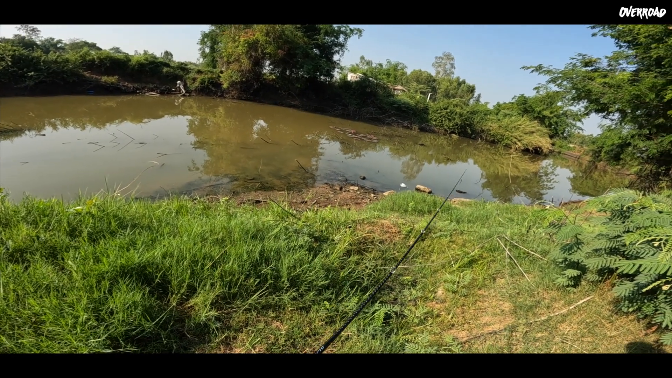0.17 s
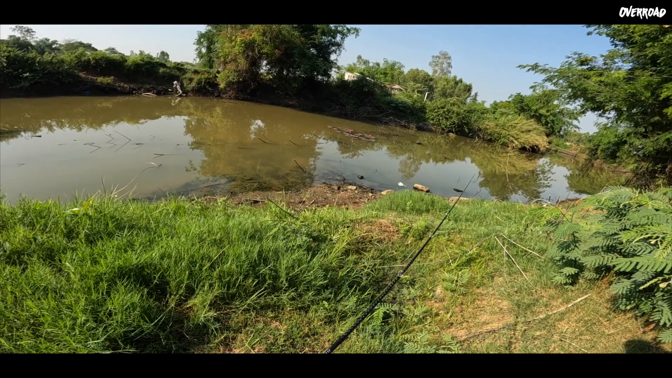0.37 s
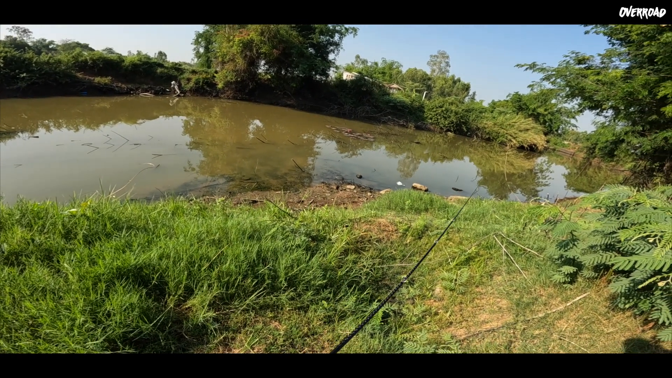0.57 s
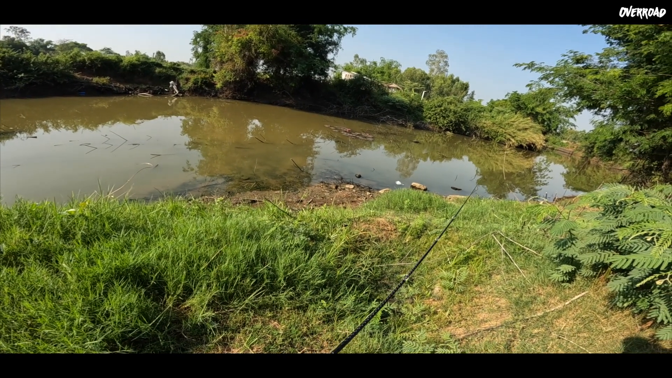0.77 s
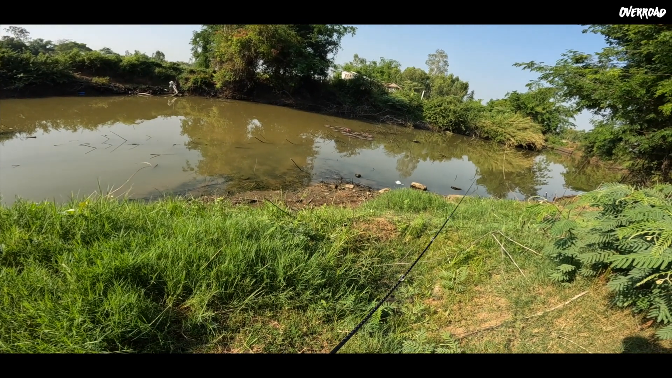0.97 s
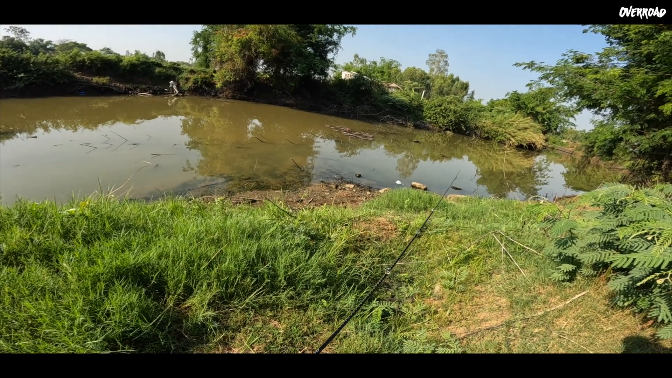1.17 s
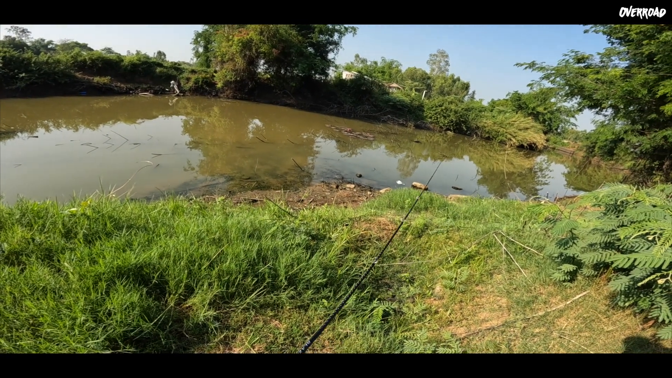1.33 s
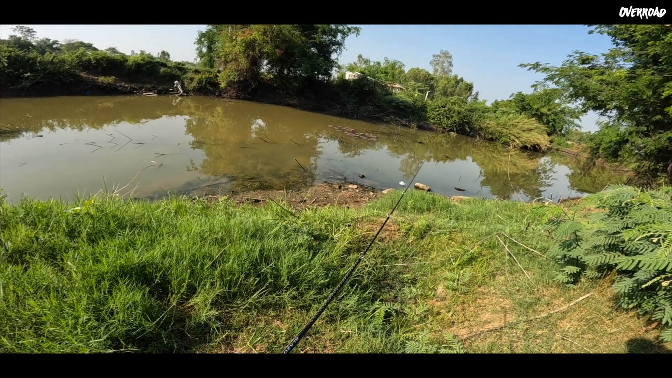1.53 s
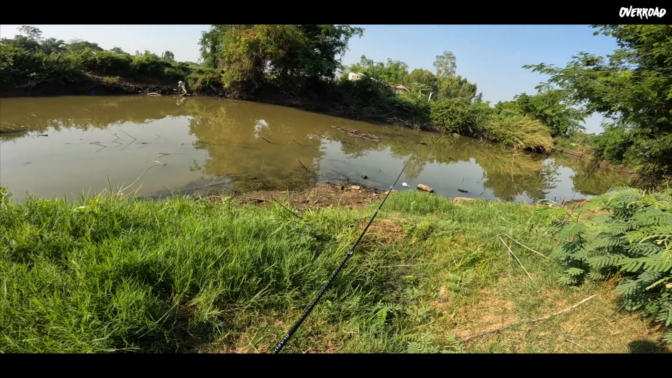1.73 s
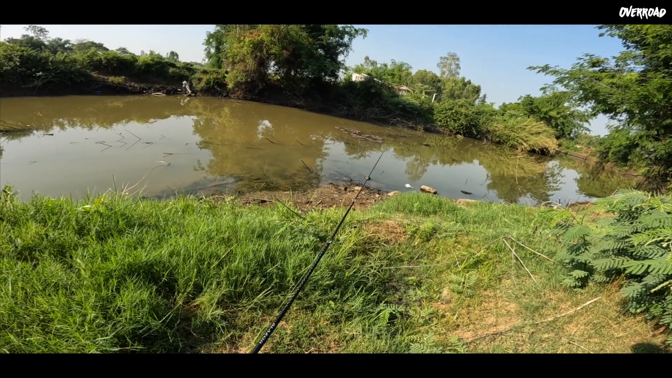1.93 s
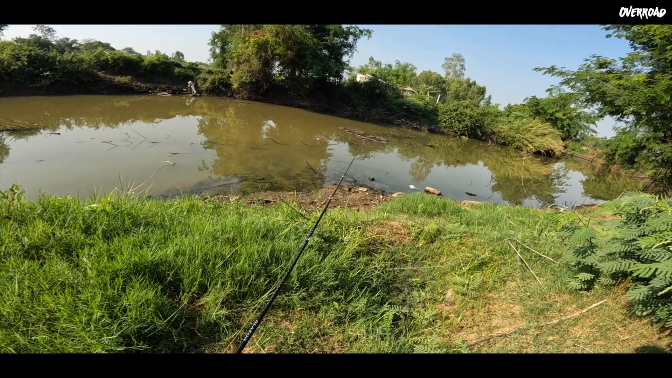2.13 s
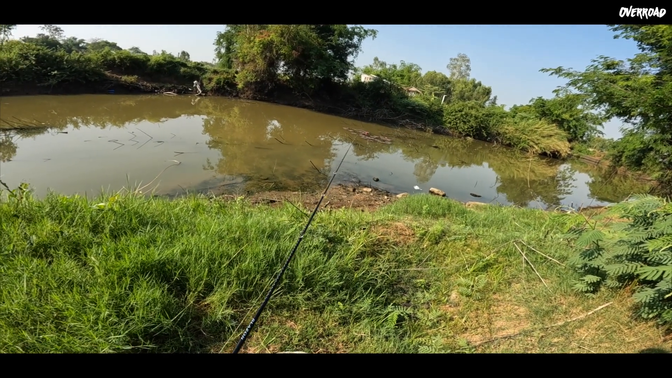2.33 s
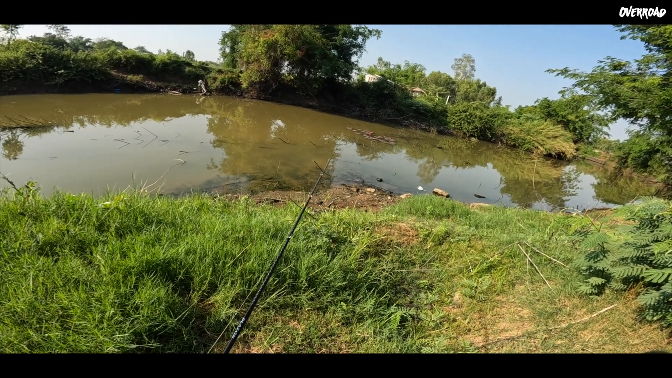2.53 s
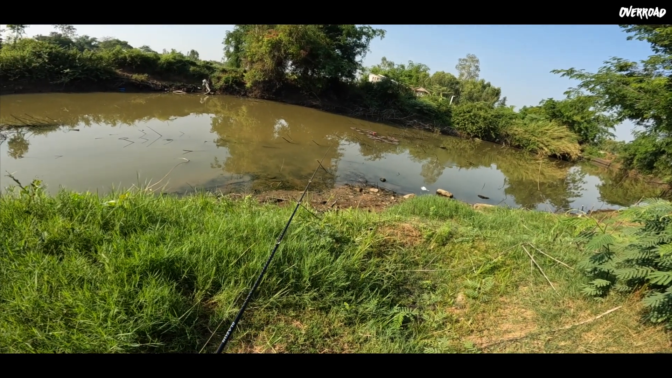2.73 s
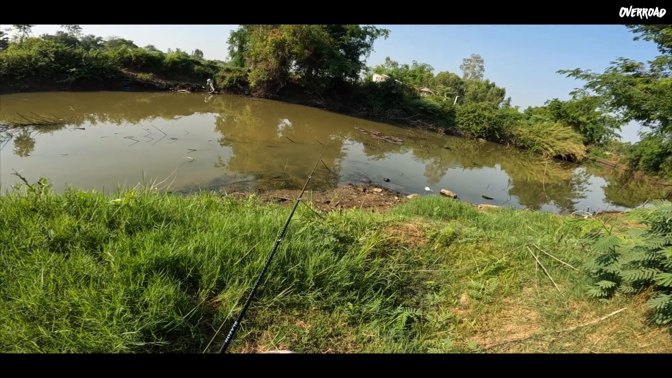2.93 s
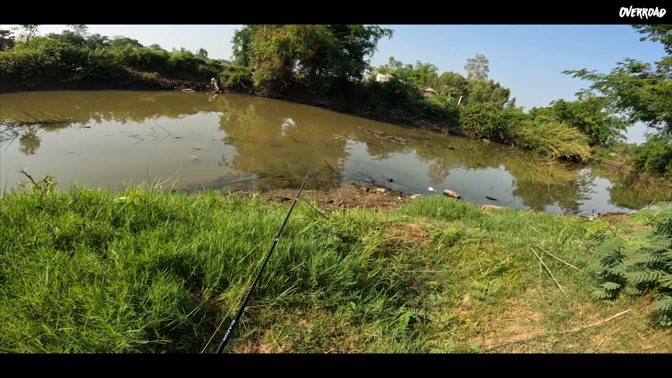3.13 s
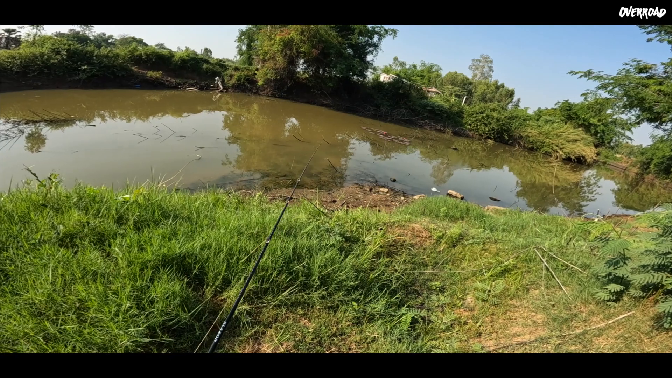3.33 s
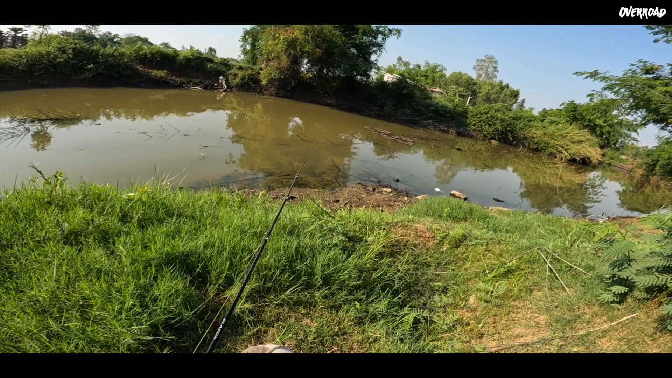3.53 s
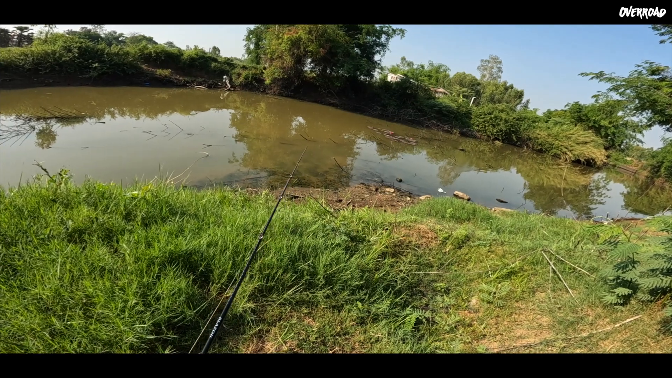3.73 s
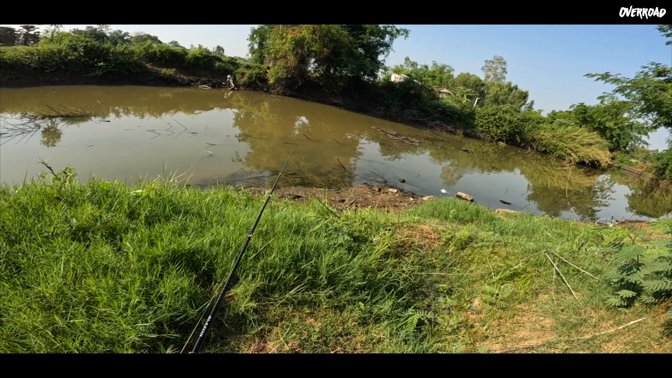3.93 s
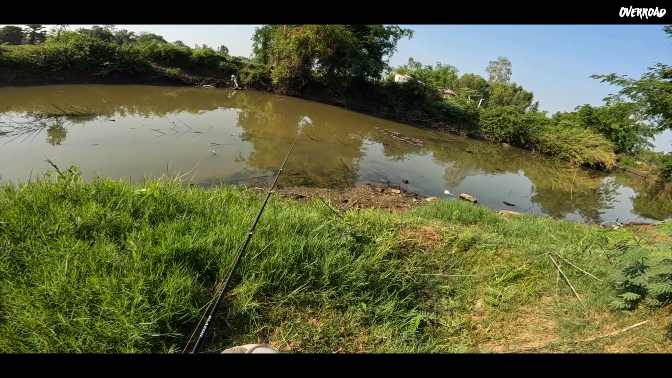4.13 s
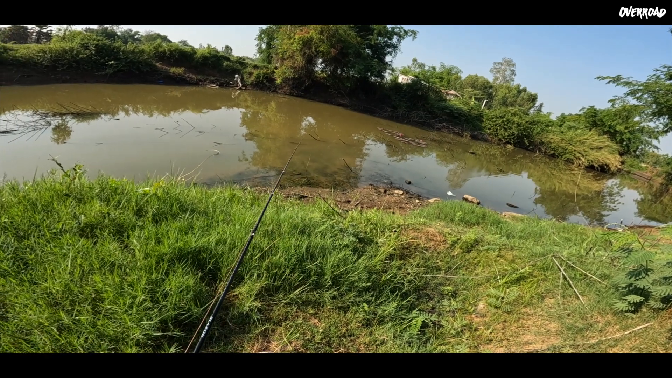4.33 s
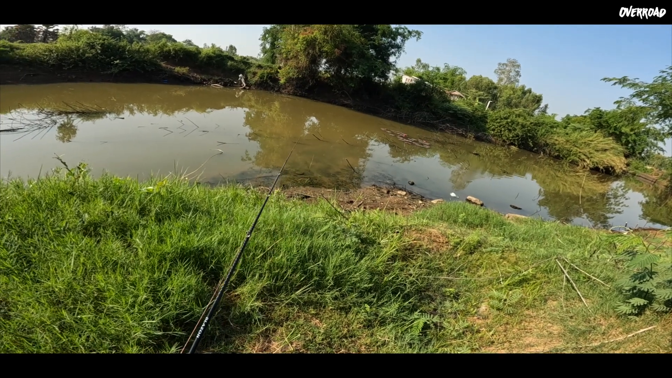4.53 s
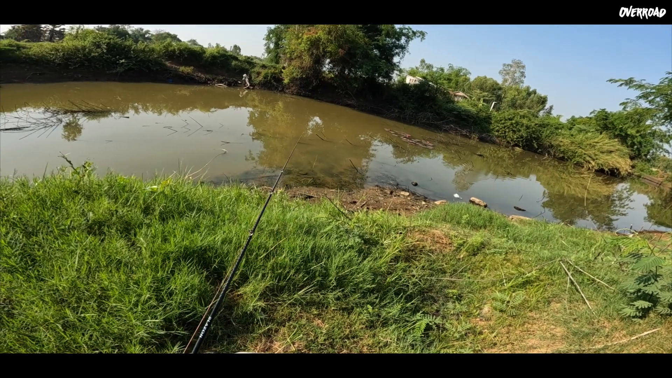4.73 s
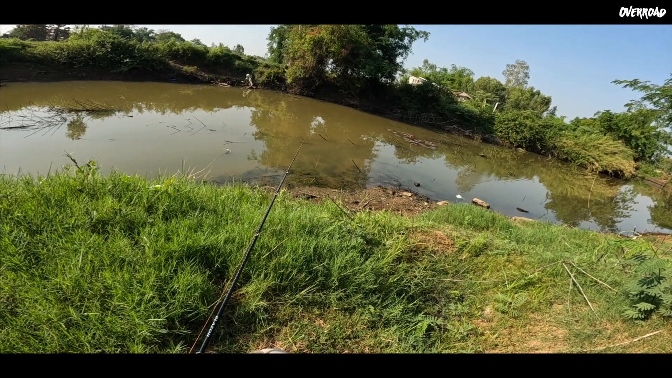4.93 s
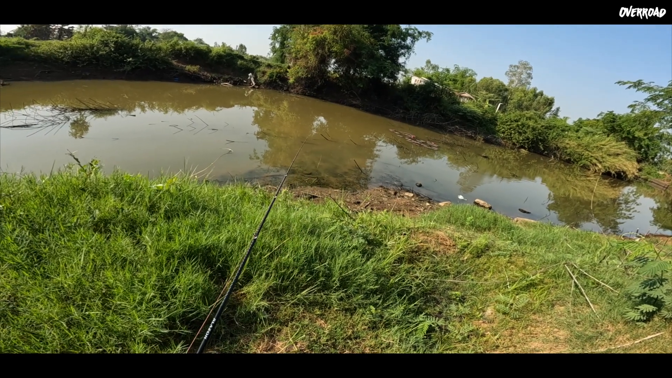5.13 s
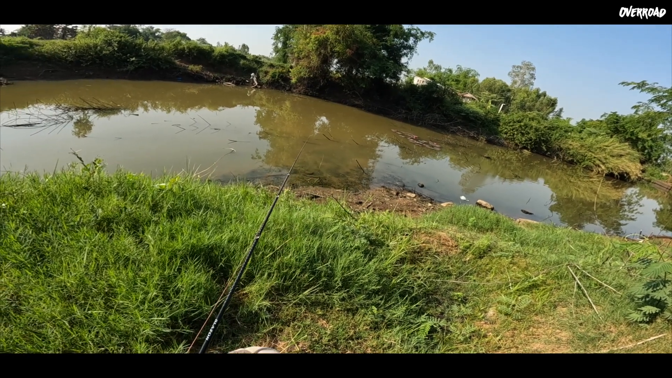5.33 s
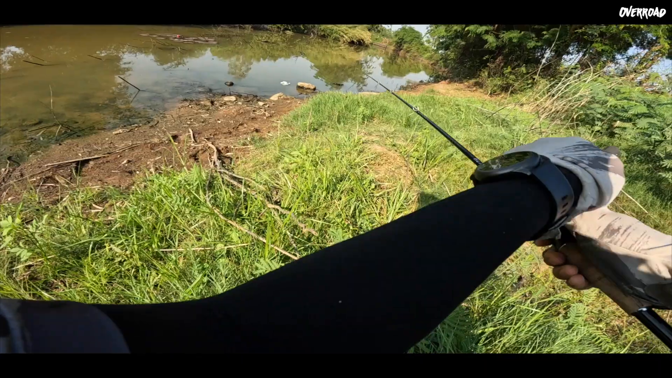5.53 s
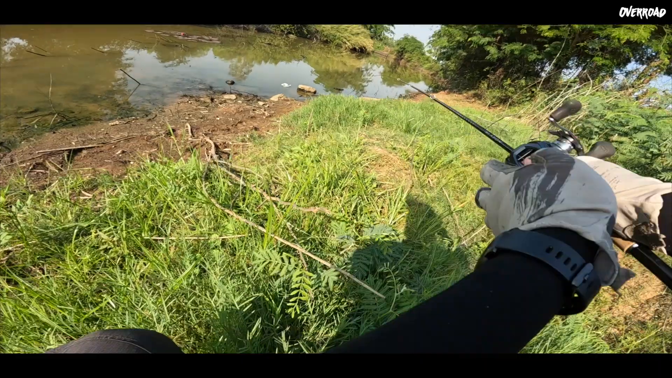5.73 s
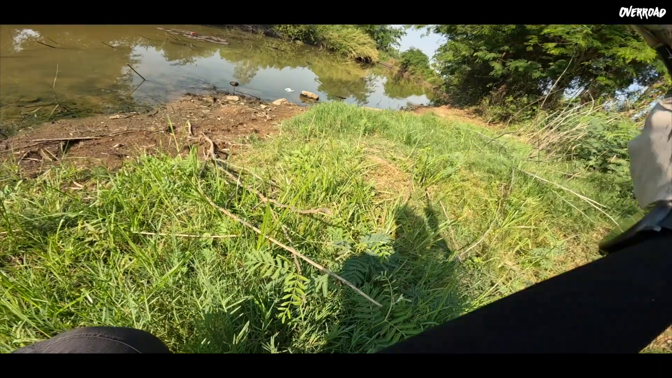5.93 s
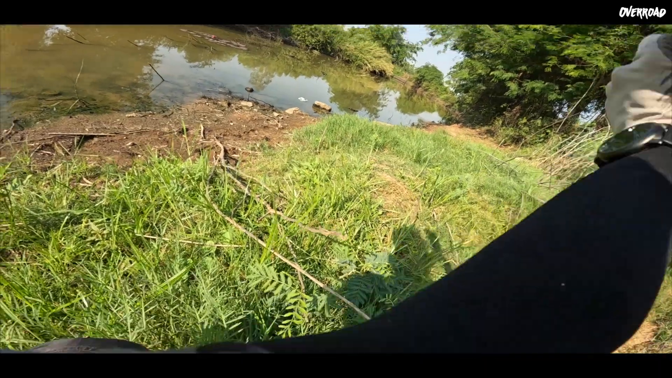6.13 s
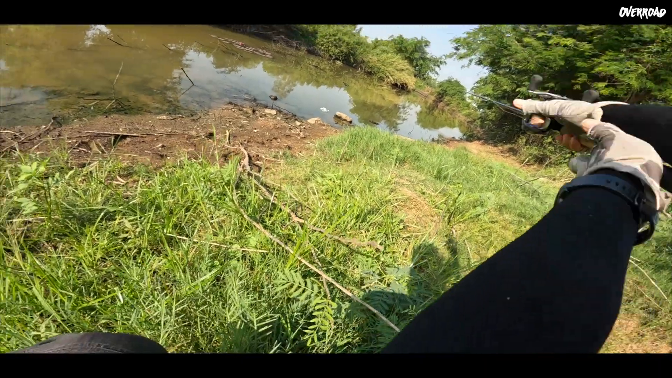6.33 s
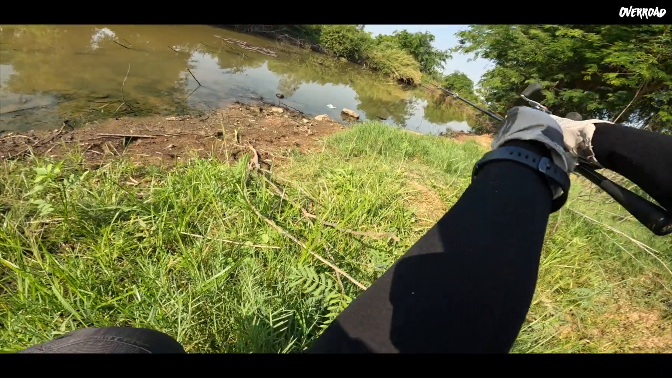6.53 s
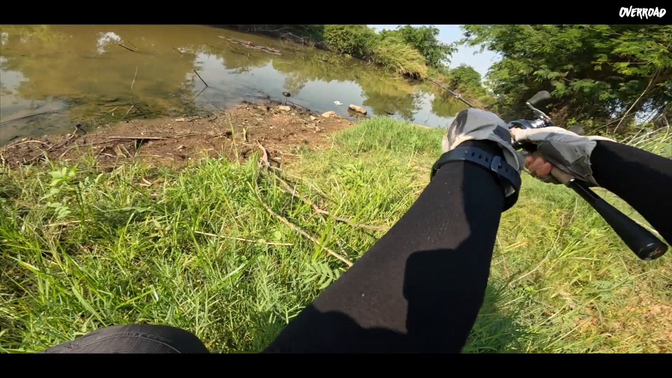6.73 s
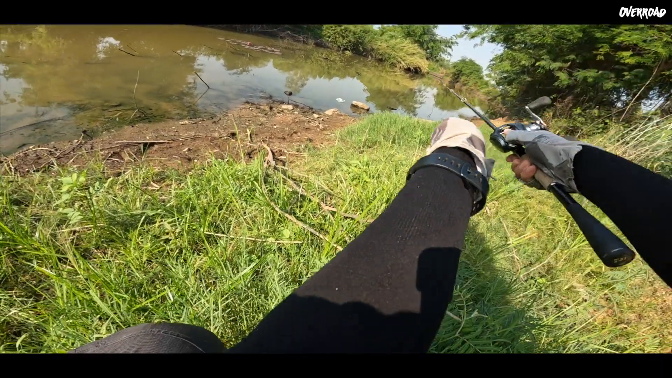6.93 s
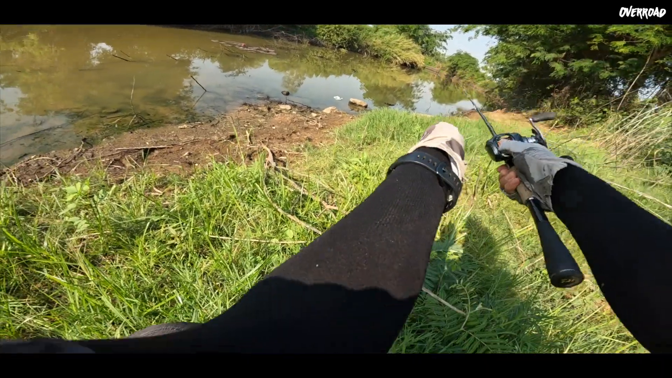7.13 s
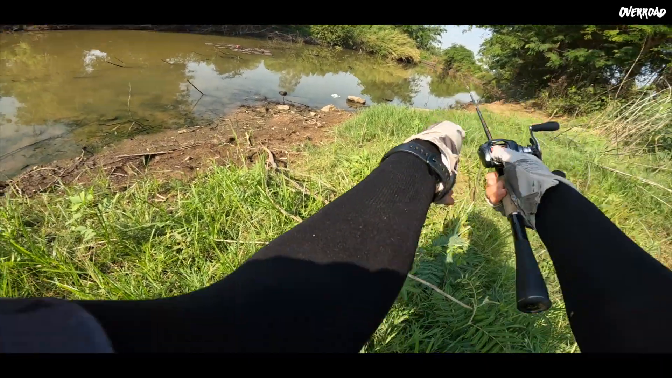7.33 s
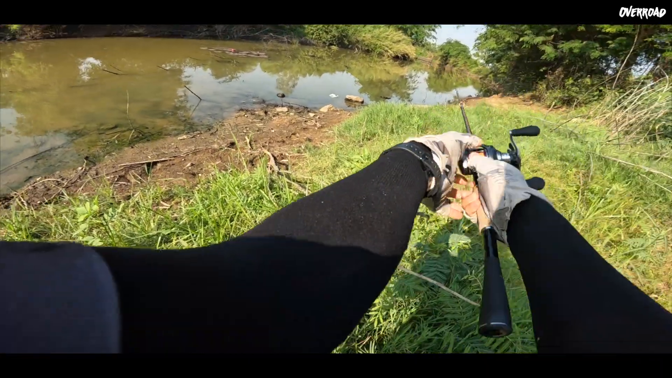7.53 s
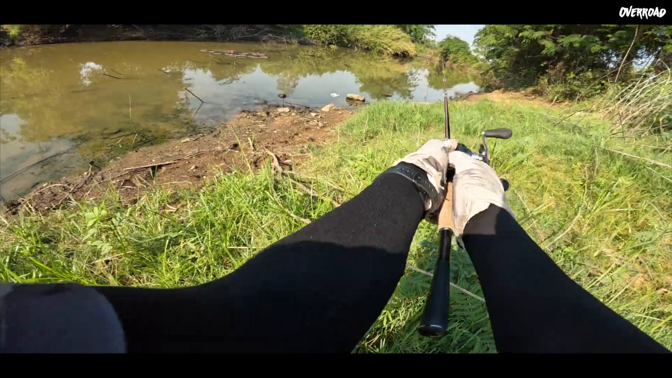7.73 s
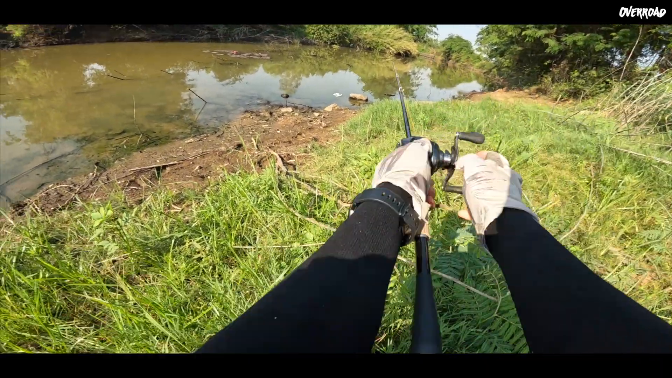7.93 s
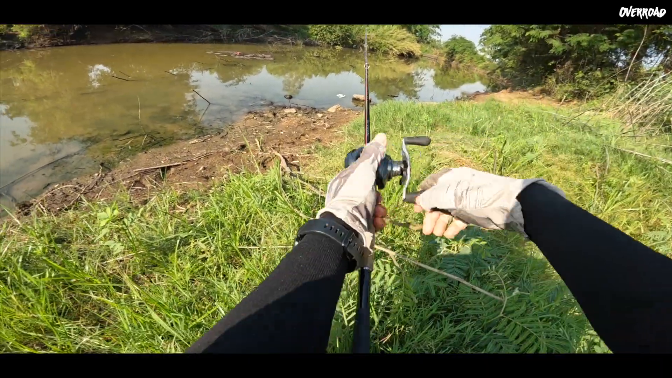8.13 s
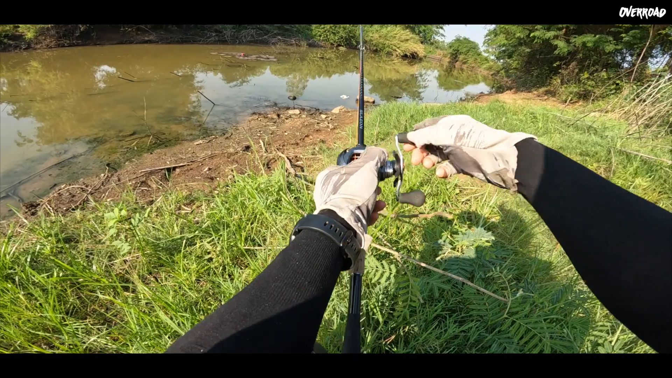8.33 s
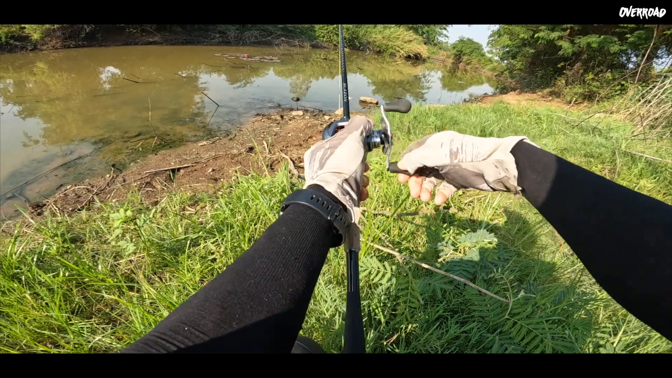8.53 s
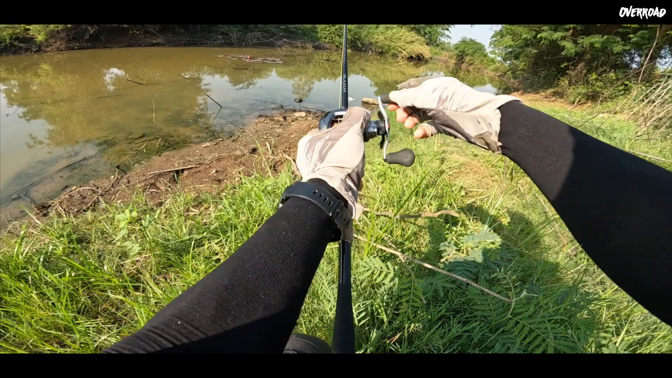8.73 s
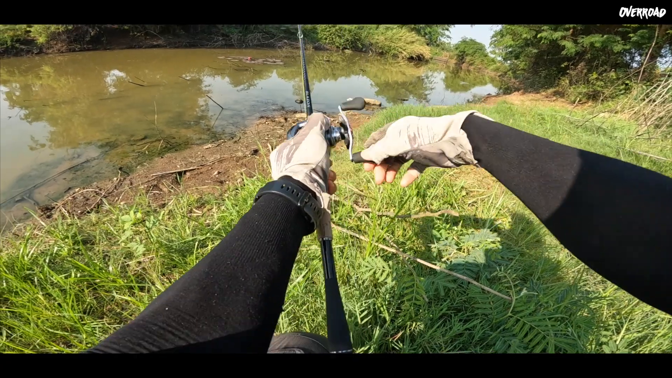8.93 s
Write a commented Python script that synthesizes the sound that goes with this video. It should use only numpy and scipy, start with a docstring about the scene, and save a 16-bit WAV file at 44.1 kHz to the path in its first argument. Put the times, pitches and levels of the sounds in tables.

```python
"""A canal bank in the country: an angler casts. The reel's clutch clicks, the rod whips the air,
the spool whirs and the handle clacks in. A pump engine throbs far off as a stack of firing-rate tones.
Water gurgles as damped rising tones; a small bird trills steadily in quick slurs and a songbird whistles
in near sines, with echoes from the trees. Distant air and cicadas are shaped noise. The sound jumps once,
with a click and a thump, to a later moment, when sleeves rustle and wind buffets the microphone as noise."""
import sys
import numpy as np
from scipy import signal
from scipy.fft import rfft, irfft
from scipy.io import wavfile
from scipy.ndimage import uniform_filter1d

SR = 44100
rng = np.random.default_rng(int(sys.argv[2]) if len(sys.argv) > 2 else 0)


def pcm_store(signal):
    """Save signal as 16-bit PCM."""
    levels = np.round(np.clip(np.atleast_2d(signal), -1, 1) * 32767)
    wavfile.write(sys.argv[1], SR, levels.astype(np.int16).T)


N = 399987
T = np.arange(N) / SR
JUMP_S = 5.482  # when the sound jumps to the later moment


def gain_of(db):
    """Decibels to an amplitude factor."""
    return 10 ** (np.asarray(db) / 20)


def evened(x):
    """Scales to rms 1."""
    return x / np.sqrt(np.mean(x ** 2) + 1e-20)


def read(points, hz):
    """Reads a spectrum table at the frequencies hz, along a log frequency axis."""
    point_hz, value = np.transpose(points)
    return np.interp(np.log(hz + 1), np.log(point_hz + 1), value)


def curves(rows, t):
    """Reads all columns of a time curve at the times t."""
    time_s, *columns = np.transpose(rows)
    return [np.interp(t, time_s, column) for column in columns]


def add(mix, start_s, sound):
    """Mixes a sound in at start_s seconds."""
    part = mix[..., max(round(start_s * SR), 0):][..., :sound.shape[-1]]
    part += sound[..., :part.shape[-1]]


def placed(x, pan_db):
    """Spreads a sound left and right; pan_db is left minus right."""
    return x * gain_of(np.array([pan_db / 2, -pan_db / 2]).reshape(2, -1))


def resonate(x, hz, width_hz):
    """A resonance of gain 1: shifts the band at hz down to zero, smooths it and shifts it back."""
    turn = np.exp(2j * np.pi * np.cumsum(hz * np.ones(len(x))) / SR)
    r = np.exp(-np.pi * width_hz / SR)
    return 2 * (turn * signal.lfilter([1 - r], [1, -r], x / turn)).real


def resonate_twice(x, hz, width_hz):
    """Two equal resonances in a row, for steeper skirts."""
    return resonate(resonate(x, hz, width_hz), hz, width_hz)


def swells(bed_db, rows):
    """A steady gain with bell-shaped rises added on top."""
    rises = sum(gain_of(db) * np.exp(-(2 * (T - s) / length) ** 2) for s, length, db in rows)
    return gain_of(bed_db) + rises


def wander(per_s):
    """A slow random curve, about per_s new values a second."""
    return np.interp(T * per_s, np.arange(200), rng.standard_normal(200))


# How alike left and right are in noise layers without a likeness of their own: freq_hz, likeness (0-1)
STEREO_LIKENESS = [(60, 0.96), (180, 0.89), (550, 0.56), (1650, 0.46), (4970, 0.86), (15000, 0.11)]


def noise(spectrum, size, patchy_db, flicker_db, same=None, tilt=None):
    """Stereo noise of rms 1 from random short-time spectra, with drifting patches and broad flicker."""
    hop = size // 4
    frames, hz = N // hop + 5, np.fft.rfftfreq(size, 1 / SR)
    a, b, c, d, patches = rng.standard_normal((frames, len(hz), 5)).T
    patches = uniform_filter1d(patches, size // 64, 0)
    patches = evened(uniform_filter1d(patches, size=4096 // hop, axis=1))
    field_db = read(spectrum, hz)[:, None]
    field_db = field_db + patchy_db * patches / (1 + hz[:, None] / 9000)  # less patchy in the treble
    field_db = field_db + flicker_db * rng.standard_normal(frames)
    if tilt is not None:  # moving brightness, dB per octave around 2500 Hz
        frame_tilt = np.interp(np.arange(frames) * hop, np.arange(N), tilt)
        field_db = field_db + np.outer(np.log2(hz / 2500 + 0.037), frame_tilt)
    like = np.clip(read(STEREO_LIKENESS, hz)[:, None] if same is None else same, 0, 1)
    left = a + 1j * b
    right = like * left + np.sqrt(1 - like ** 2) * (c + 1j * d)
    spectra = np.array([left, right]) * gain_of(field_db)
    return evened(signal.istft(spectra, nperseg=size, noverlap=size - hop)[1][:, :N])


# Tones of the pump engine: multiple of the firing rate, relative level_db
ENGINE_ORDERS = [(1, -9), (2, -2), (3, 1.5), (4, -5), (5, -3.5), (6, 4), (7, -3), (8, -10), (9, -7.5),
                 (10, -6)]
ENGINE_DB = -51.5  # rms
FIRING_HZ, DRIFT = 22.44, 0.00819  # firings a second and their slow relative wander


def engine(turns):
    """Orders of the firing rate, each swelling by itself as the air shifts."""
    out = np.zeros(N)
    for order, db in ENGINE_ORDERS:
        tone = np.cos(2 * np.pi * order * turns - 0.065 * order ** 2)
        out += gain_of(db + 1.27 * wander(6.0)) * tone
    return gain_of(ENGINE_DB) * evened(out)


def hum():
    """A wavering low hum: noise through a narrow 54 Hz resonance."""
    return gain_of(-56) * evened(resonate_twice(rng.standard_normal(N), 54, 4.3))


# Colour of the rumble: freq_hz, relative density_db (per Hz)
RUMBLE_COLOUR = [(9, -42), (15, -7), (50, 3.5), (70, 0.5), (97, -10.5), (140, -9.5), (230, -16.5),
                 (280, -21.5), (350, -35.5), (520, -45), (880, -120)]
RUMBLE_DB, RUMBLE_LATER_DB, RUMBLE_SWELL_DB = -48.5, -45.5, 1  # before and after the jump; slow wander


def rumble(turns):
    """Low noise that each engine firing pushes a little."""
    puffs = 1 + 0.057 * np.cos(2 * np.pi * turns)
    gain_db = np.where(T < JUMP_S, RUMBLE_DB, RUMBLE_LATER_DB) + RUMBLE_SWELL_DB * wander(3.0)
    return gain_of(gain_db) * noise(RUMBLE_COLOUR, size=2048, patchy_db=0.93, flicker_db=0.54) * puffs


def pump():
    """The far engine, the hum and the rumble; one drifting firing rate drives engine and rumble."""
    turns = np.cumsum(FIRING_HZ * (1 + DRIFT * wander(6.0))) / SR
    return engine(turns) + hum() + rumble(turns)


# Colour of the country air: freq_hz, relative density_db (per Hz)
AIR_COLOUR = [(160, -59), (280, -23), (354, -6), (648, -12.5), (877, -14.5), (1290, -8), (2800, -10.5),
              (4400, -14), (4950, -12.5), (7280, -16), (8470, -20.5), (10900, -17), (13300, -21),
              (14300, -52), (15500, -57)]
# Rises of the air over its bed: centre_s, length_s, rise_db
AIR_RISES = [(0.4, 1.67, -70.5), (1.56, 0.63, -75), (2.29, 0.32, -68.5), (3.3, 1.14, -73), (5.1, 0.73, -67)]


def country_air():
    """Distant air before the jump: patchy noise over a steady bed."""
    far = noise(AIR_COLOUR, size=512, patchy_db=3.0, flicker_db=1.93)
    return swells(-64, AIR_RISES) * far * (T < JUMP_S)


# Rises of the low rush over its bed: centre_s, length_s, rise_db
RUSH_RISES = [(0.9, 0.22, -68.5), (2.3, 0.34, -68), (4.0, 0.82, -76.5), (4.78, 0.45, -68),
              (5.68, 0.28, -53.5), (6.22, 0.16, -47.5), (7.15, 0.32, -61), (8.0, 0.86, -69),
              (8.9, 0.28, -63)]


def low_rush():
    """A faint rush of noise, strongest from 350 to 500 Hz, that swells now and then."""
    colour = [(200, -43), (350, -5.5), (500, -5.5), (650, -8.5), (1000, -25.5), (2000, -110)]
    return swells(-75.5, RUSH_RISES) * noise(colour, size=1024, patchy_db=5.5, flicker_db=4.0, same=0.43)


CICADA_HZ, CICADA_WIDTH_HZ, CICADA_DB, PULSES_PER_S = 10987, 710, -70.5, 170
BUZZ_START_S, BUZZ_LENGTH_S, BUZZ_HZ, BUZZ_DB, BUZZ_FADE_DB = 2.3, 0.15, 5680, -65, -2.5


def cicadas():
    """A far wide chorus before the jump: narrow-band noise in uneven quick pulses."""
    unevenness = 2.73 * uniform_filter1d(rng.standard_normal(N), size=400)
    pulses = 1 + 0.91 * np.sin(2 * np.pi * np.cumsum(PULSES_PER_S * (1 + unevenness)) / SR)
    bands = [resonate_twice(rng.standard_normal(N), CICADA_HZ, CICADA_WIDTH_HZ) for _ in "LR"]
    return gain_of(CICADA_DB) * evened(np.array(bands) * pulses) * (T < JUMP_S)


def insect_buzz():
    """One brief buzz: noise in a narrow band, fading slightly."""
    band = resonate(resonate(rng.standard_normal(N), BUZZ_HZ, 330), BUZZ_HZ, 300)
    progress = np.clip((T - BUZZ_START_S) / BUZZ_LENGTH_S, 0, 1)
    inside = (T > BUZZ_START_S) & (T < BUZZ_START_S + BUZZ_LENGTH_S)
    return evened(band) * gain_of(BUZZ_DB + BUZZ_FADE_DB * progress) * inside


# Slurs within one trill: delay_s, length_s, start_hz, bend_hz (pulls the middle), end_hz, relative level_db
TRILL_SLURS = [(-.003, 0.021, 4540, 3940, 3490, 0.5), (.022, 0.015, 4576, 4790, 4110, 3),
               (0.044, 0.012, 3470, 3280, 2950, -8.5)]


def trill(db, shift, jitter_db):
    """Three quick slurs, each bending through its middle pitch; delays count from 10 ms into the buffer."""
    out = np.zeros(SR // 10)
    for (delay, length, start_hz, bend_hz, end_hz, slur_db), chance_db in zip(TRILL_SLURS, jitter_db):
        u = np.linspace(0, 1, round(length * SR))
        hz = shift * ((1 - u) ** 2 * start_hz + 2 * u * (1 - u) * bend_hz + u ** 2 * end_hz)
        slur = np.sin(np.pi * u) ** 0.29 * np.sin(2 * np.pi * np.cumsum(hz) / SR)
        add(out, delay + .01, gain_of(db + slur_db + chance_db) * slur)
    return out


# Calls of the small bird: start_s, level_db (before the slur's own level and chance)
TRILL_CALLS = [(0.052, -47.5), (0.2503, -49), (0.454, -47.5), (0.6527, -48), (0.8506, -48.5),
               (1.053, -49.5), (1.2532, -50.5), (1.4567, -50.5), (1.6572, -50), (1.8583, -49),
               (2.056, -49.5), (2.2554, -49), (2.4514, -50.5), (2.6522, -51), (2.8486, -51), (3.0506, -51),
               (3.246, -48.5), (3.445, -51.5), (3.649, -53), (3.8577, -49.5), (4.058, -51), (4.2694, -52),
               (4.4819, -53), (4.7067, -51.5), (4.916, -53), (5.1165, -53), (5.3228, -53)]


def trilling_bird():
    """Steady trills, each a little off in pitch and level by chance."""
    out = np.zeros(N)
    for (s, db), chance in zip(TRILL_CALLS, rng.standard_normal((len(TRILL_CALLS), 4))):
        add(out, s - .01, trill(db, 1 + 0.012 * chance[0], 2.0 * chance[1:]))
    return out


# The clearest gurgles: start_s, level_db (4 dB above what is played), start_hz
CLEAR_GURGLES = [(0.271, -54, 1230), (0.687, -46, 586), (0.738, -46, 580), (0.848, -51, 1257),
                 (0.879, -55, 606), (1.373, -58, 1250), (2.08, -53, 587), (2.142, -52.5, 1380),
                 (2.35, -51, 585), (2.443, -52, 586), (3.03, -52, 1200), (3.208, -50.5, 1150),
                 (3.373, -53.5, 710), (4.054, -49, 680), (4.165, -50, 1200), (4.707, -50, 703),
                 (5.015, -50.5, 1190)]
FAINT_COUNT, FAINT_DB, FAINT_SPREAD_DB = 20, -60.5, 1.5  # on the same level scale; spread is plus or minus
FAINT_LOW_HZ, FAINT_HIGH_HZ = 496, 1373


def gurgles():
    """Bubbles ring as damped tones whose pitch climbs near the surface; faint ones fall at random."""
    out, t = np.zeros((2, N)), np.arange(SR // 4) / SR
    faint = []
    for when, level, pitch in rng.random((FAINT_COUNT, 3)):
        hz = FAINT_LOW_HZ * (FAINT_HIGH_HZ / FAINT_LOW_HZ) ** pitch
        faint.append((JUMP_S * when, FAINT_DB + FAINT_SPREAD_DB * (2 * level - 1), hz))
    bubbles = CLEAR_GURGLES + faint
    for (s, db, hz), pan_db in zip(bubbles, rng.normal(0, 9.7, len(bubbles))):
        pop = np.sin(2 * np.pi * hz * t * (1 + 2.13 * t)) * np.minimum(t / 0.001, 1)
        add(out, s, placed(gain_of(db - 4.0 - 60 * t / 0.086) * pop, pan_db))
    return out


# Ringing modes under each click: pitch_hz (each click shifts it slightly), relative level_db, t60_s
REEL_MODES = [(2880, 6, 0.012), (5620, -31, 0.015), (6850, -37, 0.017)]
# Colour of the dry crack: freq_hz, relative density_db (per Hz)
CRACK_COLOUR = [(180, -47), (300, -59), (461, -37), (1640, -3.5), (2040, 2), (2440, -1.5), (2930, 1.5),
                (4570, -11), (5210, -5.5), (9930, -18), (11100, -29), (15500, -40)]


def click(tilt, t60):
    """A dry crack of coloured noise, a little unlike at each port, over the briefly ringing modes."""
    t, hz = np.arange(4096) / SR, np.fft.rfftfreq(4096, 1 / SR)
    shared, left, right = rng.standard_normal((3, 4096))
    colour = gain_of(read(CRACK_COLOUR, hz) + tilt * np.log2(hz / 2500 + .05))
    crack = evened(irfft(rfft([shared + 0.2 * left, shared + 0.55 * right]) * colour))
    decay = gain_of(-60 * t / max(t60, .004)) + gain_of(-15.5 - 60 * t / 0.056)  # snap and softer tail
    crack *= decay * np.minimum(t / 0.00048, 1)
    treble = crack - uniform_filter1d(crack, size=7, axis=1, origin=3)
    crack -= treble * np.minimum(t / 0.014, 1)  # treble dies first
    ring = np.zeros(len(t))
    for (mode_hz, db, mode_t60), chance in zip(REEL_MODES, rng.standard_normal(len(REEL_MODES))):
        ring += gain_of(db - 60 * t / mode_t60) * np.sin(2 * np.pi * mode_hz * (1 + 0.052 * chance) * t)
    no_bass = signal.butter(2, 900, 'high', fs=SR, output='sos')  # too small to radiate bass
    both = signal.sosfilt(no_bass, crack + gain_of(-6.5) * ring)
    return both / np.sqrt(uniform_filter1d(both ** 2, size=60, axis=1).max() * 3)


# Clicks of reel and tackle, and the click of the jump at 5.48 s: start_s, level_db (nominal peak),
# brightness_db (per octave), t60_s (of the snap), pan_db (left minus right)
CLICK_ROWS = [ (0.8485, -43, 0, 0.013, 3), (1.496, -45, -5, 0.026, 2), (2.234, -45, -14, 0.022, -5),
              (2.8432, -54, -16, 0.016, -3), (2.902, -48, 6, .013, 5), (3.278, -45, -25, 0.0094, 0),
              (4.716, -39.5, -2, 0.011, -4), (5.481, -38.5, 12, .012, -2), (5.487, -42, 13, .012, 3),
              (5.536, -52, 6, .012, 1), (5.605, -44, 4, .012, -2), (5.7743, -29, 1, 0.014, -3),
              (5.7758, -11, 1.5, 0.012, -2), (5.7797, -22, 3.5, 0.071, -2), (5.916, -52.5, 1, .012, -3),
              (5.939, -39.5, 4, 0.016, 3), (5.988, -46, 8, 0.018, 1), (6.226, -36, -8, .012, 4),
              (7.02, -43.5, -2, 0.013, -7), (7.691, -38, -1, 0.017, -3), (7.816, -42, 5, .012, -1),
              (7.852, -29, -6, 0.043, -3), (8.124, -45, -3, .03, -6), (8.1462, -33, 1, .012, -3),
              (8.149, -20, 4, .01, -2), (8.1523, -4.5, 0, .013, -2), (8.1558, -20, 0, .012, -2),
              (8.1612, -28, -4, .012, -2), (8.283, -40, 2, 0.011, 5), (8.292, -36, 0, .012, -1.5),
              (8.297, -29, -1.5, 0.014, -0.5), (8.338, -40, -1, .016, -1), (8.572, -44, 1.5, 0.013, 1),
              (8.6502, -44, -5, 0.013, -8), (8.6667, -39, -8, 0.01, -6), (8.6777, -23.5, -3, 0.02, -1),
              (8.9038, -39.5, 2, 0.014, 2), (9.0084, -31, 3, .011, -1), (9.0365, -31, 3, .01, -2),
              (9.0402, -19, -1, .009, -2), ]


def clicks():
    """Clicks of reel and tackle, and of the jump, each with its own brightness and decay."""
    out = np.zeros((2, N))
    for s, db, tilt, t60, pan_db in CLICK_ROWS:
        add(out, s, placed(gain_of(db) * click(tilt, t60), pan_db))
    return out


NOTE_ENDS_DB = -12  # how much softer a short whistle begins and ends


def short_note(s, length, start_hz, middle_hz, end_hz, db, peak):
    """The curve of a short note: a bend through three pitches, swelling to its peak and fading."""
    u = np.linspace(-1, 1, num=11)
    hz = middle_hz + u * (end_hz - start_hz) / 2 + u ** 2 * ((start_hz + end_hz) / 2 - middle_hz)
    away = np.interp((u + 1) / 2, [0, np.clip(peak, .1, .9), 1], [1, 0, 1])
    return np.transpose([s + length * (u + 1) / 2, hz, db + NOTE_ENDS_DB * away ** 2])


def whistle(rows, tremble):
    """A near sine with an octave above and a slight tremble; returns its start and its sound."""
    t = np.arange(rows[0][0], rows[-1][0], 1 / SR)
    hz, db = (uniform_filter1d(c, size=130) for c in curves(rows, t))
    trembling = 1 + tremble * uniform_filter1d(rng.standard_normal(len(t)), size=80)
    phase = 2 * np.pi * np.cumsum(hz * trembling) / SR
    octave = 0.0086 + 1.9 * np.clip(1 - hz / 1900, 0, 1) ** .5  # low notes are less pure
    db += 0.86 * evened(uniform_filter1d(rng.standard_normal(len(t)), size=200))  # random roughness of level
    fade = np.minimum(np.minimum(t - t[0], t[-1] - t) / 0.0014, 1)
    tone = np.sin(phase) + octave * np.sin(2 * phase)
    return rows[0][0], np.sqrt(2) * gain_of(db) * fade * tone


# Short rough whistles: faint birds, the octave of the songbird's falling note at 3.887 s, and probably
# the running line or spool at 6.33-6.47 s: start_s, length_s, start_hz, middle_hz, end_hz,
# level_db (rms of the sine at its peak), peak_place (0-1)
SHORT_WHISTLES = [(2.32, 0.049, 4170, 4110, 4150, -54, 0.4), (2.581, 0.029, 5400, 4680, 4700, -44, .6),
                  (2.875, 0.042, 4960, 5160, 5030, -48.5, .45),
                  (3.887, 0.042, 2950, 2700, 2250, -52.5, 0.9), (3.951, 0.0096, 3140, 2850, 2600, -50, 0.6),
                  (5.788, .12, 4450, 4980, 5570, -52, .7), (6.33, .1, 2720, 2880, 2370, -40.5, 0.3),
                  (6.43, 0.038, 2000, 1800, 1900, -42.5, 0.3), (7.25, .07, 6030, 5000, 4100, -66, .4),
                  (7.367, 0.17, 2270, 2380, 2490, -60, .45), (7.71, 0.064, 2350, 2360, 2300, -57, .4),
                  (7.93, .05, 5800, 4800, 3970, -61, 0.1), (7.979, .04, 2300, 2240, 2260, -64, .45),
                  (8.01, .1, 2250, 2320, 2070, -57.5, 0.6), (8.438, .022, 5050, 4650, 4180, -64, 0.5),
                  (8.476, .026, 5000, 4600, 4200, -61, .45), (8.712, .024, 5050, 4600, 4200, -56, .45)]
# Songbird, one curve a note: time_s, pitch_hz, level_db (rms of the sine)
SONG_NOTES = [
    [(3.07, 2240, -61), (3.084, 2494, -48), (3.116, 2666, -56), (3.135, 2740, -39), (3.143, 2900, -37),
     (3.171, 4595, -35), (3.2, 4470, -56)],
    [(3.46, 4710, -60), (3.474, 4456, -49), (3.516, 4430, -37.5), (3.568, 4340, -36), (3.6, 4280, -59)],
    [(3.835, 4700, -62), (3.845, 4790, -49), (3.853, 4750, -50), (3.865, 3236, -42.5), (3.873, 2260, -44),
     (3.883, 1650, -63.5), (3.925, 1217, -59)],
    [(4.075, 3365, -47), (4.089, 3320, -41.5), (4.131, 3610, -31.5), (4.14, 3720, -52), (4.148, 3895, -39),
     (4.166, 4010, -38.5), (4.21, 4015, -66)],
    [(4.5, 4080, -47), (4.514, 4120, -48), (4.536, 3912, -40.5), (4.622, 3940, -40.5), (4.635, 4060, -55)],
    [(4.86, 2410, -50), (4.87, 2660, -52), (4.895, 2632, -47), (4.922, 2820, -42.5), (4.945, 2700, -52)],
    [(4.945, 2700, -62), (4.953, 2495, -44.5), (4.981, 2130, -49.5), (5.0, 2074, -60), (5.01, 2220, -54),
     (5.02, 2909, -45), (5.032, 3530, -36.5), (5.046, 4248, -55), (5.05, 4460, -57)],
    [(5.484, 3440, -34), (5.51, 3566, -31), (5.528, 3820, -29.5), (5.538, 4050, -42.5), (5.59, 4130, -58)],
    [(5.93, 4400, -61), (5.948, 4166, -43.5), (5.962, 4150, -37), (6.0, 3993, -32), (6.028, 3980, -34),
     (6.066, 4025, -36), (6.102, 4050, -50), (6.12, 4100, -57)],
    [(6.478, 3030, -61), (6.486, 3270, -33), (6.498, 4000, -41.5), (6.508, 4430, -58)],
]


def whistles():
    """The songbird's whistled notes and the short whistles, which tremble more."""
    out = np.zeros(N)
    for row in SHORT_WHISTLES:
        add(out, *whistle(short_note(*row), tremble=0.15))
    for rows in SONG_NOTES:
        add(out, *whistle(rows, tremble=0.036))
    return out


def trees(x, t60):
    """Sparse echoes of random sign from trunks and banks; moving leaves keep swapping three sets of paths."""
    taps = np.zeros((3, 2, SR))
    at = np.arange(500, SR - 20, 20) + rng.integers(0, 20, (3, 2, (SR - 501) // 20))
    np.put_along_axis(taps, at, rng.choice([-1., 1.], at.shape), 2)
    taps *= gain_of(-60 * np.arange(SR) / SR / t60)
    paths = signal.fftconvolve(x[None, None], taps / np.linalg.norm(taps[0, 0]), axes=2)[..., :N]
    sway = 2 * np.pi * 7 * T + np.arange(3)[:, None] * 2 * np.pi / 3  # 7 rounds a second
    return (paths * np.cos(sway / 2)[:, None] ** 2).sum(0)


def whistles_and_trills():
    """All whistles and trills with their tree echoes; the jump cuts the earlier echoes off."""
    small, song = trilling_bird(), whistles()
    before = T < JUMP_S
    echoes = trees((song + small) * before, 0.65) * before + trees(song * ~before, 0.33)
    direct = placed(song, np.where(before, -1.5, 2.5)) + placed(small, -.8)
    return direct + gain_of(-11.5) * echoes


# Motion of the sleeves: time_s, gain_db, brightness_db (per octave)
SLEEVE_MOTION = [(5.48, -43.5, -5), (5.56, -49, -2), (5.75, -48.5, -0.5), (5.87, -51, -3),
                 (6.09, -47.5, -2), (6.16, -43, -5.5), (6.22, -46.5, 1.5), (6.28, -40, 2), (6.4, -41, -2),
                 (6.55, -46.5, 0.24), (6.85, -53, -0.5), (7.32, -50, 0), (7.6, -55, -0.8),
                 (7.82, -51, -0.3), (7.94, -54, 1), (8.25, -52, 0), (8.5, -58.5, 1.1), (8.7, -53, -1.1),
                 (9.07, -52, -0.5)]
# Colour of the cloth: freq_hz, relative density_db (per Hz)
CLOTH_COLOUR = [(150, -15), (250, -6), (442, -5), (795, -23), (1070, -4.5), (1850, -8), (2440, -6),
                (3830, -10), (5040, -10), (6770, -12), (8770, -20.5), (12200, -26), (15500, -42)]
SLEEVE_LEFT_DB, SLEEVE_PASSES_S = 3.0, 6.25  # rustles to the left until the arms swing forward


def sleeves():
    """Close cloth after the jump: flickering noise with moving level and brightness."""
    gain_db, tilt = curves(SLEEVE_MOTION, T)
    pan_db = SLEEVE_LEFT_DB * (T < SLEEVE_PASSES_S)
    cloth = noise(CLOTH_COLOUR, size=256, patchy_db=1.7, flicker_db=2.0, same=0.71, tilt=tilt)
    return placed(gain_of(gain_db), pan_db) * cloth * (T >= JUMP_S)


# Gusts over the lull: centre_s, length_s, rise_db
WIND_GUSTS = [(5.48, 0.071, -21), (5.7, 0.46, -40.5), (5.99, 0.054, -36), (6.17, .12, -26.5),
              (6.32, 0.21, -20.5), (6.62, 0.18, -47), (7.29, 0.27, -51), (7.8, 0.089, -37),
              (7.98, 0.26, -34.5), (8.3, 0.36, -32), (8.63, 0.17, -31), (8.83, 0.14, -24.5),
              (8.95, 0.09, -21.5), (9.07, 0.066, -21)]
LULL_DB, WIND_PAN_DB = -55, -3  # pan is left minus right


def wind():
    """Slow lumps of pressure on the microphone after the jump, partly shared by the two ports."""
    colour = [(3, 5.5), (12, -5.0), (30, -12), (70, -41.5), (300, -39.5), (1000, -118)]
    lumps = noise(colour, size=4096, patchy_db=2.2, flicker_db=1.0, same=0.67)
    lumps /= np.sqrt(uniform_filter1d(lumps ** 2, size=SR // 6, axis=1) + 0.29)  # levels the strong lumps
    return placed(swells(LULL_DB, WIND_GUSTS), WIND_PAN_DB) * lumps * (T >= JUMP_S)


# Dull knocks, the first two the thump of the jump, the others on the rod grip:
# start_s, level_db (1 dB below what is played), pitch_hz
DULL_KNOCKS = [(5.482, -39, 623), (5.485, -30, 55.1), (5.601, -35, 570), (5.778, -31, 776),
               (5.935, -42, 458), (6.008, -40, 430), (6.14, -40, 300), (6.366, -27.5, 491)]


def knocks():
    """Damped tones with two weaker overtones; low knocks ring longer."""
    out, t = np.zeros((2, N)), np.arange(SR // 4) / SR
    for s, db, hz in DULL_KNOCKS:
        thud = np.sin(2 * np.pi * hz * t)
        thud += 0.3 * np.sin(2 * np.pi * 1.84 * hz * t)
        thud += 0.2 * np.sin(2 * np.pi * 2.9 * hz * t)
        add(out, s, gain_of(db + 1.0 - 60 * t * hz / 21) * thud * np.minimum(t / 0.0014, 1))
    return out


# Vortex trains from the rod tip: centre_s, peak_db (before the slight pan), pitch_hz, cycles
VORTICES = [(6.236, -43, 1080, 7.8), (6.25, -24, 1920, 6.4), (6.26, -20, 1500, 8.9),
            (6.266, -22.5, 7200, 18), (6.27, -17, 1840, 3.9), (6.278, -13, 2037, 13),
            (6.282, -25.5, 4400, 32), (6.284, -18, 2050, 8.8), (6.288, -20, 3180, 53),
            (6.288, -30, 7350, 68), (6.293, -28, 5100, 20), (6.296, -18.5, 2150, 12), (6.296, -14, 3280, 8)]


def vortices():
    """Trains of vortices torn from the rod tip: short wavering whistles, out of step left and right."""
    out = np.zeros((2, N))
    for (s, peak_db, hz, cycles), chance in zip(VORTICES, rng.standard_normal((len(VORTICES), 3))):
        phase, lag, bend = chance
        length = cycles / hz
        u = np.linspace(-1, 1, round(length * SR))
        angle = np.pi * cycles * (u + 0.057 * bend * u ** 2) + phase + np.array([[.4], [-.4]]) * lag
        add(out, s - length / 2, gain_of(peak_db) * np.cos(np.pi * u / 2) ** 2 * np.sin(angle))
    return out


# Sweep of the rod: time_s, gain_db, brightness_db (per octave)
ROD_SWEEP = [(6.12, -59, 10.5), (6.14, -42.5, 6.5), (6.174, -64, 11), (6.22, -48, -8), (6.243, -44, -12.5),
             (6.252, -29, -1), (6.274, -22.5, 1.9), (6.296, -23.5, 3), (6.304, -32.5, 1), (6.33, -34, -1)]
# Colour of the rushing air: freq_hz, relative density_db (per Hz)
ROD_AIR_COLOUR = [(180, -58), (300, -30), (892, -7.5), (1050, -13), (1160, -4), (2040, -2.5), (2480, -13),
                  (3230, -10.5), (4800, -18.5), (7620, -19.5), (15500, -56)]


def whip():
    """The cast: a fast rush of air round the rod, with its vortex whistles."""
    gain_db, tilt = curves(ROD_SWEEP, T)
    inside = (T > ROD_SWEEP[0][0]) & (T < ROD_SWEEP[-1][0])
    air = noise(ROD_AIR_COLOUR, size=128, patchy_db=0.0, flicker_db=1.0, same=0.62, tilt=tilt)
    return placed(gain_of(gain_db) * inside * air + vortices(), 0.5)


# Resonances of the reel's frame: pitch_hz, width_hz (of each of two passes), relative gain_db
REEL_FRAME = [(1840, 610, 13.5), (2410, 870, 11.5), (3380, 260, -19), (7340, 1600, -3)]
SPIN_S, HOLD_S, STOP_S = 6.3, 6.438, 6.95  # starts, begins to run down, stops
SPIN_DB, RUNDOWN_DB_PER_S, RATTLES_PER_S = -44, 45, 350  # level before panning; mean rattle rate


def spool():
    """Uneven rattles of the spinning spool, with some hiss, ring the reel's frame."""
    gain_db = SPIN_DB - RUNDOWN_DB_PER_S * np.maximum(T - HOLD_S, 0)
    unevenness = 1.9 * uniform_filter1d(rng.standard_normal(N), size=60)
    count = np.floor(np.cumsum(RATTLES_PER_S * (1 + unevenness)) / SR)
    rattles = (np.diff(count, prepend=0) > 0) * gain_of(6.0 * rng.standard_normal(N))
    drive = evened(rattles) + 0.87 * rng.standard_normal(N)
    frame = sum(gain_of(db) * resonate_twice(drive, hz, width) for hz, width, db in REEL_FRAME)
    spinning = (T > SPIN_S) & (T < STOP_S)
    return placed(gain_of(gain_db) * evened(frame) * spinning, -6.2)


# Fabric brushing fabric: start_s, length_s, level_db (rms before fades), pitch_hz, width_hz (each of two passes)
FABRIC_BRUSHES = [(6.503, 0.36, -57, 5950, 2490), (7.042, 0.16, -65, 11200, 2500),
                  (7.081, 0.49, -59, 2190, 1090), (7.986, .1, -56, 4800, 1800),
                  (7.993, 0.086, -67, 9200, 1800)]


def brushes():
    """Fabric on fabric: soft hisses, each in its own band."""
    out = np.zeros((2, N))
    for s, length, db, hz, width in FABRIC_BRUSHES:
        shared, left, right = rng.standard_normal((3, round(length * SR)))
        pair = [resonate_twice(shared + 0.4 * own, hz, width) for own in (left, right)]
        fade = signal.windows.tukey(len(shared), .7)
        add(out, s, gain_of(db) * evened(np.array(pair)) * fade)
    return out


def scene():
    """Everything that reaches the two microphone ports."""
    far = pump() + country_air() + low_rush() + cicadas() + insect_buzz()
    near = whistles_and_trills() + gurgles() + wind() + clicks() + knocks()
    return far + near + sleeves() + whip() + spool() + brushes()


def record(dry):
    """Limits the band to 15600 Hz with a steep low-pass."""
    lowpass = signal.firwin(511, 15600, window=("kaiser", 9), fs=SR)
    return signal.oaconvolve(dry, lowpass[None], "same")


dry = scene()
out = record(dry)
pcm_store(out)
```